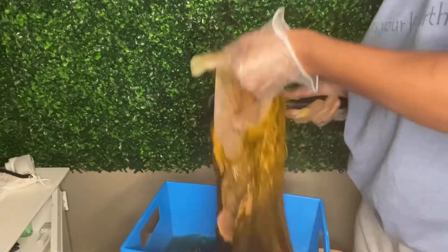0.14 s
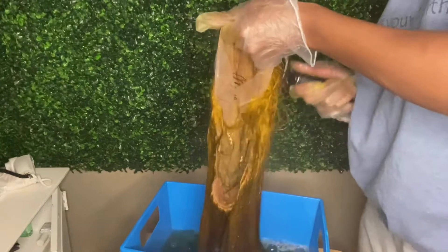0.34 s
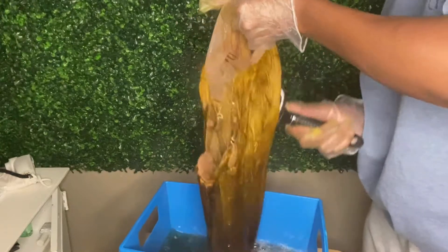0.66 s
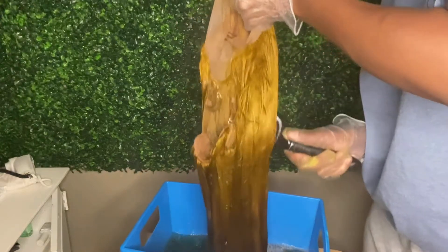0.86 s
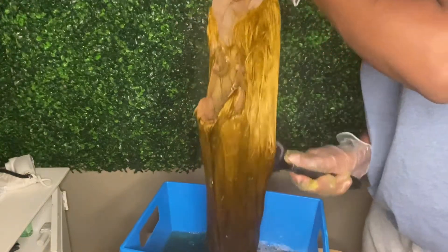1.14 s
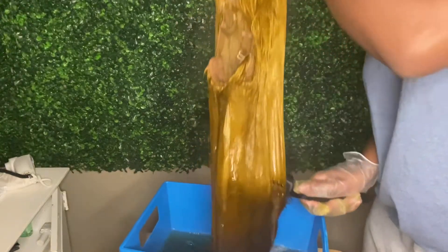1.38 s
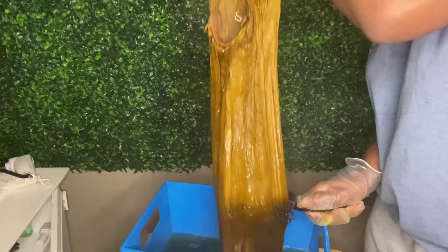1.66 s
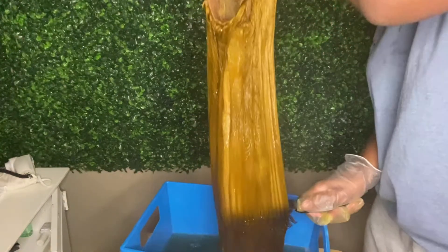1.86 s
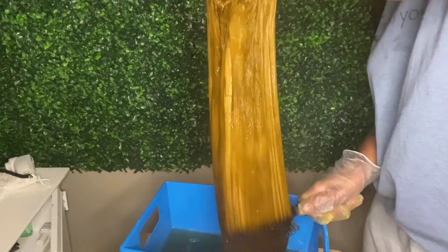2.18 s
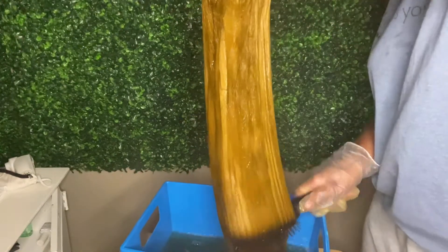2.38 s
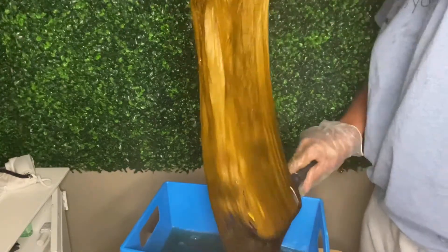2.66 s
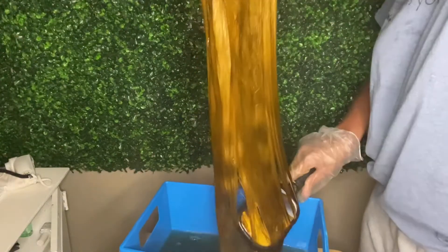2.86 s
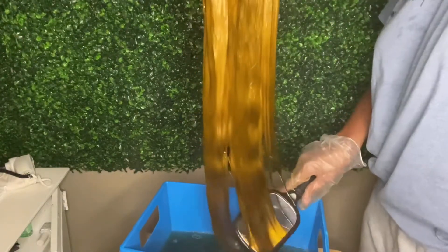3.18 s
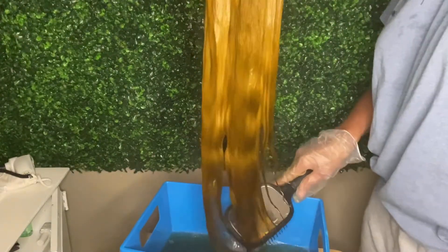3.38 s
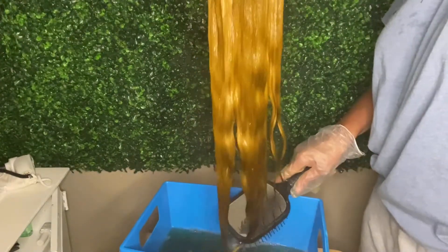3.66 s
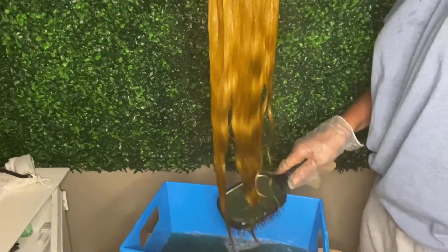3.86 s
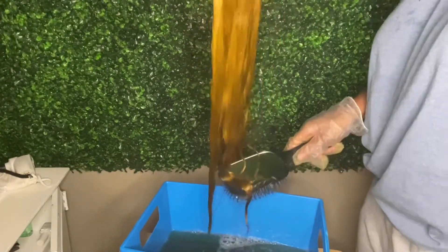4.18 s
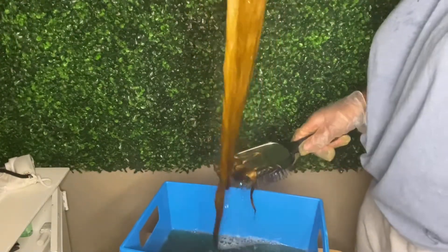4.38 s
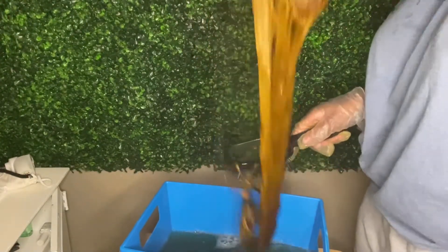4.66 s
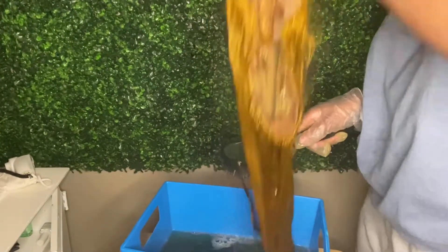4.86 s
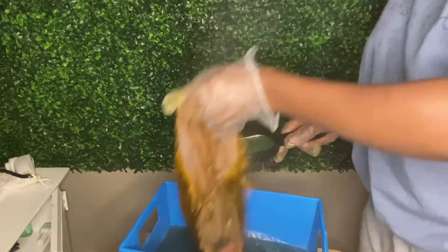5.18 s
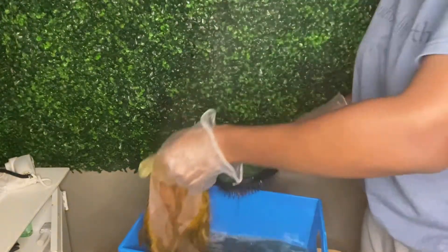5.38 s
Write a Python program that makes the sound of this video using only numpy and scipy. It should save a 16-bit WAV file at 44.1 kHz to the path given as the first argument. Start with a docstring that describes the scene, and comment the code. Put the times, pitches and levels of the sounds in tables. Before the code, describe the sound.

Close to a phone microphone in a small, faintly humming room, drops tick and plip into water in a plastic tub. One long brush stroke slips through a wet wig with an uneven rasp, followed by a fizzing, gurgling trickle. Then come several short, dull brush tugs that make the tub boom softly, with sparse drips between them, and finally a quick flurry of louder drops that thins out again.

```python
"""Water trickles and drips off a soaked wig into a plastic bin; then a brush rasps through the hair.
The bristles slip over wet strands in one long stroke, and short tugs follow, each a thump with a boom
from the bin. The drops tick as they land and trap bubbles that ring. A small room with a low hum,
heard from close by the bin through the two microphone ports of a phone."""
import sys
import numpy as np
from scipy import signal
from scipy.fft import rfft, irfft, next_fast_len
from scipy.io import wavfile
from scipy.ndimage import uniform_filter1d

SR = 44100
rng = np.random.default_rng(int(sys.argv[2]) if len(sys.argv) > 2 else 0)


def materialize(psi):
    """Save the field psi as 16-bit PCM at rate SR to the path in sys.argv[1].

    A 1-D psi becomes a single channel; in a 2-D psi each row is a channel.
    """
    bounded = np.clip(np.atleast_2d(psi).T, -1, 1)
    quanta = np.round(bounded * 32767).astype(np.int16)
    wavfile.write(sys.argv[1], SR, quanta)


N = 243873

# Water running off the hair. Each row: time in seconds, spray and gurgle levels in relative dB.
RUNOFF = [(0.0, -70.5, -65), (0.06, -77.5, -86.5), (0.21, -79.5, -67), (0.38, -73, -69.5),
          (0.8, -51.5, -61.5), (1.12, -69, -43), (1.25, -82, -62), (1.36, -70, -71.5), (1.49, -72, -73.5),
          (1.59, -63, -55.5), (1.77, -65.5, -60), (1.9, -62.5, -49), (2.0, -56, -57), (2.14, -86, -73.5),
          (2.4, -70.5, -94), (2.66, -75.5, -84), (2.76, -92, -90.5), (3.13, -88, -100),
          (3.72, -84.5, -87.5), (4.28, -93, -92), (4.38, -84, -80), (4.55, -79.5, -115), (4.8, -60.5, -54),
          (5.08, -77.5, -74), (5.35, -68.5, -74.5), (5.53, -82.5, -89)]


def gain_of(db):
    return 10 ** (np.asarray(db) / 20)


def unit_rms(x):
    return x / np.sqrt(np.mean(x ** 2) + 1e-20)


def at_pitch(points, hz):
    """Read (Hz, value) points along a logarithmic pitch axis."""
    f, value = np.transpose(points)
    return np.interp(np.log(hz + 1), np.log(f + 1), value)


def curves(rows):
    """Rows of (seconds, values..) as one curve per value column."""
    times, *columns = np.transpose(rows)
    return [np.interp(np.arange(N) / SR, times, column) for column in columns]


def ramp(middle_s, length_s, levels_db):
    """A level that moves from one value to another around the given moment."""
    return np.interp(np.arange(N) / SR, [middle_s - length_s / 2, middle_s + length_s / 2], levels_db)


def add(mix, start_s, sound):
    part = mix[..., max(round(start_s * SR), 0):][..., :sound.shape[-1]]
    part += sound[..., :part.shape[-1]]


def butter(hz, kind, order=2):
    return signal.butter(order, hz, kind, fs=SR, output="sos")


def coloured(x, spectrum):
    """Minimum-phase filtering to a (Hz, dB) spectrum, at an rms of 1."""
    hz = abs(np.fft.fftfreq(8192, 1 / SR))
    log_gain = np.log(gain_of(np.maximum(at_pitch(spectrum, hz), -100)))
    taps = np.fft.ifft(np.exp(np.conj(signal.hilbert(log_gain)))).real[:4096]
    return unit_rms(signal.oaconvolve(x, taps)[:len(x)])


def clicks(per_s, spread_db):
    """Random clicks, a few of them large."""
    size = gain_of(spread_db * np.minimum(rng.exponential(1, N), 3)) * rng.choice([-1., 1.], N)
    return size * (rng.random(N) < per_s / SR)


def clumps(seconds):
    """A random wobble of rms 1 that changes over the given time."""
    size = max(round(seconds * SR), 2)
    return unit_rms(uniform_filter1d(uniform_filter1d(rng.standard_normal(N), size), size))


def pan(left_db):
    """Stereo gains with the left side this much louder than the right."""
    return gain_of([[left_db / 2], [-left_db / 2]])


def diffuse(left, right, shared):
    """Sound from all around: the two ports share more or less of it, pitch by pitch."""
    # Each row: frequency in Hz, likeness at the two ports from 0 to 1.
    port_likeness = [(100, 0.83), (400, 0.36), (2000, 0), (5000, 0), (8000, 0.99)]
    same = np.clip(at_pitch(port_likeness, np.fft.rfftfreq(len(shared), 1 / SR)), 0, 1)
    return irfft(same * rfft(shared) + np.sqrt(1 - same ** 2) * rfft([left, right]), len(shared))


def room_tone():
    """A lumpy low hum and a faint hush, both from all around."""
    # Spectra of hum and hush. Each row: frequency in Hz, relative density in dB.
    hum_spectrum = [(12, -25), (20, -10.5), (54, 1.5), (72, -0.5), (91, -15), (130, -40), (170, -34),
                    (290, -120)]
    hush_spectrum = [(53, -36), (90, 5.5), (325, -7.5), (1010, -16.5), (1660, -28), (4050, -56),
                     (8000, -20), (12000, -33.5), (15600, -19), (16400, -35)]
    # The swells of the hum. Each row: time in seconds, level in dB.
    hum_levels = [(0.0, -67), (0.2, -77), (0.51, -51.5), (0.72, -68), (1.2, -62), (2.8, -72.5),
                  (2.96, -57.5), (3.28, -74), (3.54, -62), (3.8, -67.5), (3.88, -55), (4.05, -68.5),
                  (4.74, -75), (4.84, -61), (5.11, -72.5), (5.53, -72.5)]
    hum = diffuse(*[coloured(noise, hum_spectrum) for noise in rng.standard_normal((3, N))])
    hush = diffuse(*[coloured(noise, hush_spectrum) for noise in rng.standard_normal((3, N))])
    hum_db, = curves(hum_levels)
    return gain_of(hum_db) * hum + gain_of(-74) * hush


def room_echoes(x):
    """Sparse echoes of a small room, each band dying at its own speed; the bin's walls answer first."""
    # Each row: frequency in Hz, seconds to die away by 60 dB.
    decay_times = [(150, 0.41), (500, 0.36), (1500, 0.23), (4000, 0.35), (10000, 0.1)]
    out, size = 0, SR // 2
    drift = np.arange(N) / SR / .45
    for k in range(3):  # hands and hair keep moving, so the echoes drift between three patterns
        taps = np.zeros((3, size))
        arrivals = np.arange(40, size - 20, 20) + rng.integers(0, 20, (3, (size - 41) // 20))
        np.put_along_axis(taps, arrivals, rng.choice([-1., 1.], arrivals.shape), 1)
        taps *= 1 + 1.41 * np.exp(-np.arange(size) / (0.0021 * SR))  # the walls of the bin
        hz, t, bands = signal.stft(diffuse(*taps), SR, nperseg=256)
        decay = gain_of(-60 * t / at_pitch(decay_times, hz)[:, None])
        tail = signal.istft(bands * decay, SR, nperseg=256)[1]
        share = np.sqrt(2 / 3) * np.cos(np.pi * (drift + k / 3))
        out = out + signal.fftconvolve(share * x, tail / np.linalg.norm(tail[0]), axes=1)[:, :N]
    return out


def bubble(hz, cycles, glide):
    """Trapped air rings: a tone that swells in about a cycle, slides in pitch and dies."""
    cycles = max(cycles, 1)
    age = np.arange(round(4 * cycles / hz * SR)) / SR * hz / cycles  # in ring lengths
    turns = np.cumsum(hz * np.clip(glide, .6, 2.5) ** np.minimum(age, 1.5)) / SR
    swell = np.sin(np.pi / 2 * np.minimum(turns / 1.2, 1)) ** 2
    return swell * np.exp(-.9 * age ** 1.5) * np.sin(2 * np.pi * turns)


def swarm(pitches, per_s, spread_db, cycles):
    """Each (Hz, relative dB) is one size of bubble, ringing at random about per_s times a second."""
    out = np.zeros((2, N))
    for hz, db in pitches:
        ring = bubble(hz, cycles * rng.uniform(1.0, 1.03), glide=1.092)
        grain = unit_rms(ring) / np.sqrt(cycles / hz)  # equal energy for every size
        place = pan(rng.uniform(-1.4, 2.2))
        out += gain_of(db) * place * signal.oaconvolve(clicks(per_s, spread_db), grain)[:N]
    return unit_rms(out)


def stray_drops():
    """Lesser drops of many sizes plip now and then, louder when more water runs."""
    spray_db, _ = curves(RUNOFF)
    pitches = [(hz, 0) for hz in np.geomspace(2050, 6300, 24)]
    plips = swarm(pitches, per_s=1.6, spread_db=4.0, cycles=3.5)
    return gain_of(-81 + 0.31 * (spray_db + 80)) * plips


def trickle():
    """Droplets land in clumps and fizz over a thin hiss; larger bubbles gurgle at the bin's pitches."""
    # The fine spray. Each row: frequency in Hz, relative density in dB.
    spray_spectrum = [(900, -42), (1500, -13.5), (2500, -1), (4000, -7), (6000, -9), (9000, -6.5),
                      (12500, -16.5), (15600, -19), (16400, -45)]
    # Resonances of the air above the water. Each row: pitch in Hz, width in Hz, relative level in dB.
    air_modes = [(522, 50.6, -5.5), (693, 100, -10.5), (1070, 216, 4), (1530, 82, -8), (1737, 72, 2)]
    spray_db, gurgle_db = curves(RUNOFF)
    small_hz = np.geomspace(1800, 14000, 16)
    small_db = at_pitch(spray_spectrum, small_hz) + 10 * np.log10(small_hz)  # higher bands are wider
    fizz = swarm(zip(small_hz, small_db), per_s=90, spread_db=3.8, cycles=3.)
    hiss = coloured(rng.standard_normal(N), spray_spectrum)
    offsets = -0.51, -0.61, -0.23, 1.0
    large = [(hz + width * offset, db) for hz, width, db in air_modes for offset in offsets]
    gurgle = swarm(large, per_s=50, spread_db=6.5, cycles=3.6)
    spray = gain_of(spray_db + 3.8 * clumps(0.0031)) * (fizz + 0.62 * hiss)
    return spray + gain_of(gurgle_db) * gurgle


def drips():
    """Each drop ticks faintly on impact, then its bubble rings, wrapped in splatter around its pitch."""
    # The drops that stand out; a large one traps several bubbles. Each row: start in seconds,
    # relative level in dB, pitch in Hz, ring length in cycles, glide as a pitch ratio.
    drops = [(0.1177, -51.5, 7070, 13, 1.37), (0.1189, -53, 810, 13, 0.95), (0.141, -48, 4120, 11, 0.86),
             (0.1952, -38, 1138, 14, .85), (0.2135, -37, 1127, 4.7, 1.09), (0.2722, -48, 1396, 15.5, 1.09),
             (0.2803, -51.5, 1310, 8.2, 1), (0.349, -33, 3070, 0.99, 1.1), (0.428, -34.5, 6550, 1.9, 0.65),
             (0.4303, -33.5, 617, 0.94, 1.01), (0.631, -27, 3320, 2.6, 0.83), (0.6766, -26, 1530, 4.3, .96),
             (0.6783, -27.5, 8200, 6.2, 1.07), (0.694, -27, 520, 1.7, 0.82), (0.696, -29.5, 5250, 17, 0.87),
             (0.7236, -27, 1610, 2.7, 0.82), (1.1817, -38, 4800, 6.2, 1.05), (1.398, -35, 2920, 4.9, 1.13),
             (1.4159, -36.5, 7950, 3.8, 0.97), (1.443, -45, 1500, 3.8, 0.9), (1.5457, -47, 1040, 4.5, 1.07),
             (1.6047, -31.5, 1030, 1.3, 0.95), (1.61, -44, 1840, 13, 1.07), (1.6592, -37, 2480, 3.3, 1.05),
             (1.6742, -44, 2010, 19, 0.93), (1.7023, -42, 560, 2, .9), (1.8426, -28, 3330, 3.1, 1.05),
             (1.851, -36, 3700, 5.4, 1.08), (1.8661, -40.5, 1540, 11.4, 1.2), (1.8975, -40, 690, 6, 1.27),
             (1.8995, -22, 5650, 4.7, 0.87), (1.9423, -39.5, 502, 4.8, 1.08),
             (1.9769, -33, 2800, 3.2, 0.93), (2.0089, -40, 2720, 4.1, 1.03), (2.01, -31.5, 580, 2.6, 0.9),
             (2.0121, -31.5, 1074, 6.7, 1.06), (2.023, -26.5, 2700, 1.26, 0.66),
             (2.118, -32, 4900, 1.7, 0.92), (2.1793, -57, 1790, 16, 1.06), (2.2247, -47.5, 3080, 4.8, 1.2),
             (2.3286, -31.5, 3580, 1.2, 0.81), (2.356, -43, 6100, 6.1, 1.14), (2.4356, -57.5, 1290, 3, .82),
             (2.4708, -48.5, 3850, 11, 0.9), (2.472, -44.5, 1430, 1.9, .93), (2.618, -52, 2046, 18, 0.99),
             (2.677, -47, 2540, 0.85, .91), (2.6948, -50, 3800, 2.2, .9), (2.9941, -31.5, 3820, 1.04, 0.5),
             (3.0072, -37.5, 1910, 1.5, 0.98), (3.024, -36, 2220, 1.2, 0.89),
             (3.0543, -43.5, 3900, 2.9, 0.96), (3.2639, -50, 4200, 2.9, 0.92),
             (3.3212, -46.5, 4230, 10, 1.06), (3.4, -63, 1050, 5, 1.03), (3.463, -41.5, 550, 1.64, 0.92),
             (3.5099, -45.5, 3180, 2.9, 1.05), (3.58, -45, 3300, 3.9, 0.88), (3.7566, -44, 2330, 0.88, 1.3),
             (3.7912, -50.5, 4300, 7.9, 0.97), (3.826, -53, 525, 7.3, 0.8), (3.948, -44.5, 4000, 1.4, 0.98),
             (4.0767, -39.5, 1029, 9.5, .91), (4.105, -56, 4300, 2.9, 1), (4.1089, -45, 960, 3.4, 0.83),
             (4.118, -40.5, 3400, 1.5, 1.16), (4.178, -49.5, 1290, 2.4, 0.81),
             (4.2371, -47, 8200, 22, 1.26), (4.4327, -44, 1570, 5, 0.79), (4.5042, -40.5, 1610, 3.2, 1.16),
             (4.522, -46, 786, 21, 1.62), (4.545, -51, 1550, 16, 1.1), (4.577, -44, 5950, 2.8, 0.98),
             (4.6256, -44, 5730, 2.4, 1.3), (4.6508, -41, 5210, 3, 1.07), (4.6796, -30.5, 2440, 1.65, 1.08),
             (4.688, -48.5, 2368, 68, .99), (4.7025, -40, 1540, 12, 0.9), (4.749, -38.5, 6300, 4.2, 0.63),
             (4.7765, -39, 1080, 4.1, 1.05), (4.7988, -42, 4160, 8.8, 0.98), (4.9121, -24.5, 787, 7.2, 0.9),
             (4.9123, -26.5, 1187, 5.3, 0.92), (4.9166, -15.5, 2660, 1.8, 1.35),
             (4.9311, -24, 3250, 3.5, 1.6), (4.9646, -38, 670, 4.6, 1.53), (4.966, -36, 7750, 5.8, 0.9),
             (4.9835, -22.5, 1470, 1.75, 1.15), (5.028, -34.5, 5200, 2.6, 1.01),
             (5.0533, -35.5, 2040, 3.9, 0.66), (5.1704, -34, 3350, 3.6, 1.04),
             (5.195, -43, 2160, 3.7, 1.08), (5.2563, -39, 6300, 1.9, 0.92), (5.3017, -48, 5630, 3.4, 1.16),
             (5.3418, -35.5, 2600, 7.8, 0.83), (5.3651, -43, 2520, 3.6, 1.4),
             (5.3735, -34.5, 6940, 1.6, 1.06), (5.3793, -54, 1145, 6.4, 0.71),
             (5.386, -35, 2440, 3.1, 1.05), (5.3933, -43, 3100, 18, 1.3)]
    tick_t60_s, splatter_t60_s = 0.003, 0.068
    out, t = np.zeros((2, N)), np.arange(3000) / SR
    for (start, db, hz, cycles, glide), noise in zip(drops, rng.standard_normal((len(drops), len(t)))):
        place = pan(0.6 + 1.5 * noise[-1])  # scattered, a little to the left
        tick_band = butter([hz / 2.7, min(4.1 * hz, 18000)], "band")  # larger drops tick duller
        tick = unit_rms(signal.sosfilt(tick_band, noise))
        tick *= gain_of(-14 - 60 * t / tick_t60_s) * np.minimum(t / .0003, 1)
        splatter = unit_rms(signal.sosfilt(butter([hz / 1.48, hz * 1.63], "band"), noise))
        splatter *= gain_of(-22 - 60 * t / splatter_t60_s) * np.minimum(t / 0.00077, 1)
        add(out, start, gain_of(db) * place * bubble(hz, cycles, glide))
        add(out, start, gain_of(db) * place * (tick + splatter))
    return out


def brush_tugs():
    """Short tugs burst with noise: treble comes and dies first, the thump swells and the bin booms."""
    # Each row: start in seconds, relative level in dB, rise and length in seconds,
    # slope above the thump in dB per octave, boom in dB against that level.
    tugs = [(2.314, -63, 0.0033, 0.083, -12, -10), (2.463, -56, 0.0022, 0.059, -3, -22),
            (2.995, -40, 0.0077, 0.14, -5.5, -14), (3.251, -60.5, 0.005, 0.034, -12.5, -29),
            (3.456, -47, 0.0016, 0.078, -11.5, -3.5), (3.591, -49.5, 0.014, 0.074, -11, -36),
            (3.823, -48, 0.0062, 0.051, -8, -3.5), (4.071, -46.5, 0.0094, 0.12, -4, -12.5),
            (4.343, -53, 0.03, 0.14, -3.5, -12.5), (4.803, -38, 0.0043, 0.088, -8.5, -9.5),
            (5.497, -49.5, 0.023, 0.21, -19, -22)]
    # Thump of bin and water. Each row: frequency in Hz, relative level in dB, rise in seconds.
    thump = [(60.4, 3, 0.29), (135, -2.5, 0.0092), (253, -0.5, 0.023), (484, -8.5, 0.002),
             (990, -5, 0.0017)]
    boom_hz, boom_peak_share = 124, 0.39  # the bin's lowest mode peaks this far into the tug
    out = np.zeros(N)
    hz, t = np.fft.rfftfreq(512, 1 / SR)[:, None], np.arange(340) * 64 / SR
    thump_hz, thump_db, thump_rise = np.transpose(thump)
    swell = np.minimum(t / np.maximum(at_pitch(np.c_[thump_hz, thump_rise], hz), .001), 1)
    octaves = np.log2(np.maximum(hz / 450, 1))
    for start, db, rise, length, slope_db, boom_db in tugs:
        colour = gain_of(at_pitch(np.c_[thump_hz, thump_db], hz) + slope_db * octaves)
        fade = gain_of(-20 * (t * (1 + 0.11 * octaves) / length) ** 1.76)
        real, imag = rng.standard_normal((2, len(hz), len(t)))
        burst = signal.istft((real + 1j * imag) * colour * swell * fade, nperseg=512, noverlap=448)[1]
        age = np.arange(len(burst)) / SR
        burst = 0.24 * np.minimum(age / rise, 1) * burst / burst[:4000].std()
        boom_age = age / (boom_peak_share * length)
        tone = np.sin(2 * np.pi * boom_hz * rng.uniform(.92, 1.08) * age)
        boom = boom_age * np.exp(.5 - .5 * boom_age ** 2) * tone
        add(out, start, gain_of(db) * (burst + gain_of(boom_db) * boom))
    return out


def brush_stroke():
    """Bristles slip over wet strands in uneven clumps; body, squelch and sizzle are bands of the slips."""
    # Drag through the long stroke. Each row: time in seconds, relative level in dB.
    drag = [(0.373, -62), (0.552, -52.5), (0.65, -39), (0.732, -38), (0.824, -42.5), (1.022, -45.5),
            (1.154, -41), (1.282, -60.5), (1.36, -90)]
    # Bristles on wet hair. Each row: frequency in Hz, relative density in dB.
    slip_spectrum = [(53, -66), (90, -19), (190, -7), (378, 1), (600, -2), (865, -4.5), (1250, -0.5),
                     (1810, -1.5), (3060, -11), (5740, -25), (8000, -25), (12000, -31.5), (15600, -40),
                     (16400, -84)]
    drag_db, = curves(drag)
    start, end = drag[0][0], drag[-1][0]
    touching = np.interp(np.arange(N) / SR, [start, start + 0.017, end - .03, end], [0, 1, 1, 0])
    squelch_db = ramp(middle_s=0.757, length_s=0.035, levels_db=(-29, -8))  # reaching the soaked hair
    sizzle_db = ramp(middle_s=0.659, length_s=0.033, levels_db=(-19.5, -3.5))
    slips = coloured(clicks(per_s=2100, spread_db=3.5) * gain_of(2.3 * clumps(0.003)), slip_spectrum)
    body = signal.sosfiltfilt(butter(900, "low"), slips)
    sizzle = signal.sosfiltfilt(butter(2400, "high"), slips)
    squelch = slips - body - sizzle
    rasp = unit_rms(body) + gain_of(squelch_db) * unit_rms(squelch)
    rasp += gain_of(sizzle_db) * unit_rms(sizzle)
    return touching * gain_of(drag_db) * rasp


def scene():
    """Water and brush close up, with the room's echoes and hum behind them."""
    # Each pair: sound, level sent to the room in dB.
    sources = [(drips(), -3.5), (trickle(), -2), (stray_drops(), -2.5),
               (brush_stroke(), -6), (brush_tugs(), -6)]
    direct = sum(sound for sound, _ in sources)
    sent = sum(sound * gain_of(send_db) for sound, send_db in sources)
    return gain_of(-0.5) * (direct + room_echoes(sent)) + room_tone()


def record(dry):
    """The phone's microphone loses the deepest bass and top treble; its two ports differ in phase."""
    # Each row: frequency in Hz, lead of the left port in radians.
    port_phases = [(0, 0), (800, .5), (3000, .9), (5600, 1.3), (9500, -3.14), (12100, -6.28),
                   (14700, -9.42), (16500, -11.6)]
    band_limit_hz = 16400
    heard = signal.sosfilt(butter(36, "high"), dry)
    heard = signal.sosfilt(butter(15700, "low", order=8), heard)
    size = next_fast_len(N + 2048)
    hz, lead = np.transpose(port_phases)
    turn = np.exp(.5j * np.interp(np.fft.rfftfreq(size, 1 / SR), hz, lead))
    ported = irfft(rfft(heard, size) * [turn, 1 / turn], size)[:, :N]
    band_limit = signal.firwin(511, band_limit_hz, window=("kaiser", 9), fs=SR)
    return signal.oaconvolve(ported, band_limit[None], "same")


dry = scene()
out = record(dry)
materialize(out)
```